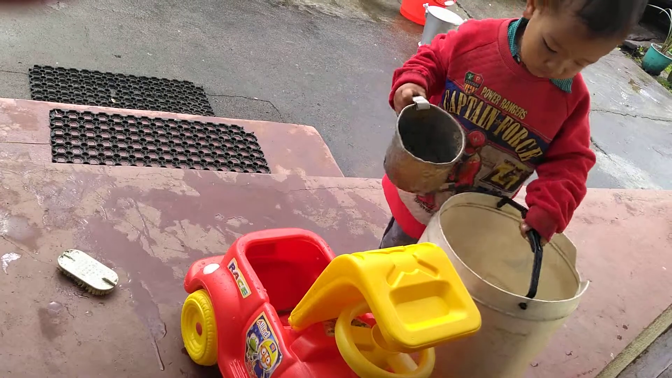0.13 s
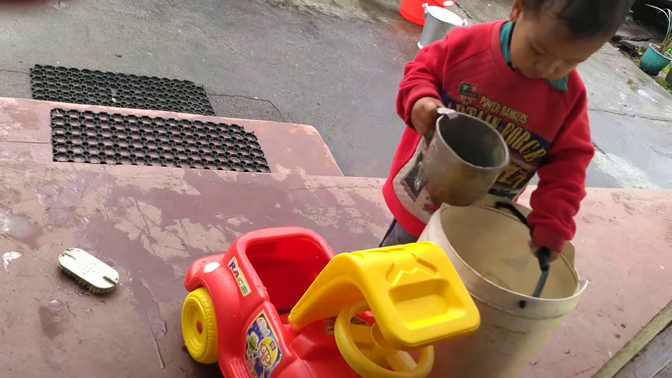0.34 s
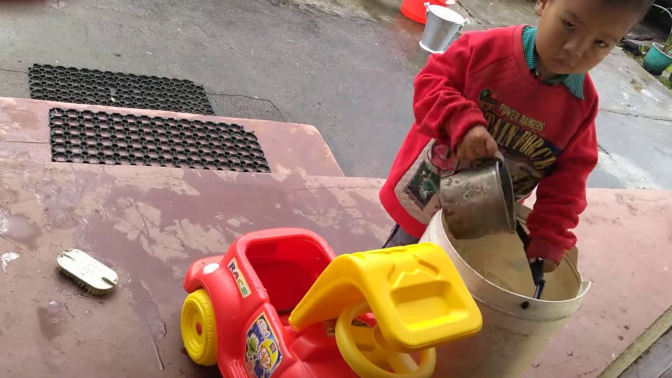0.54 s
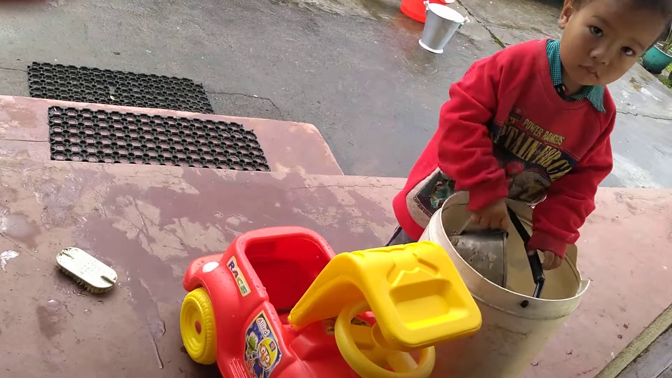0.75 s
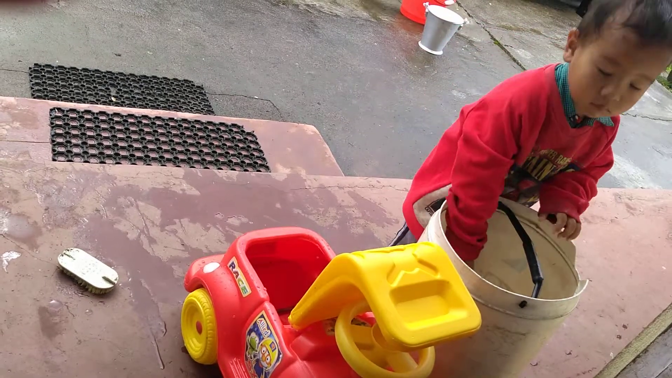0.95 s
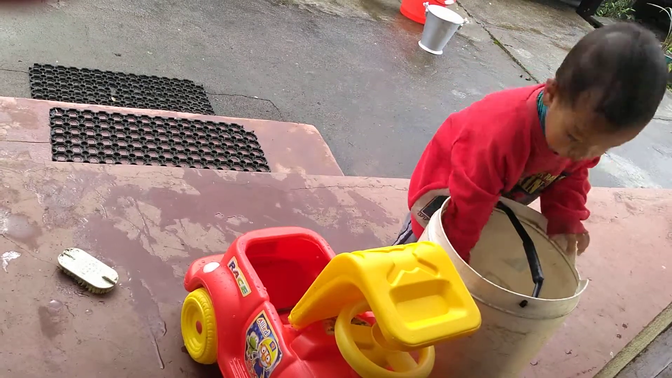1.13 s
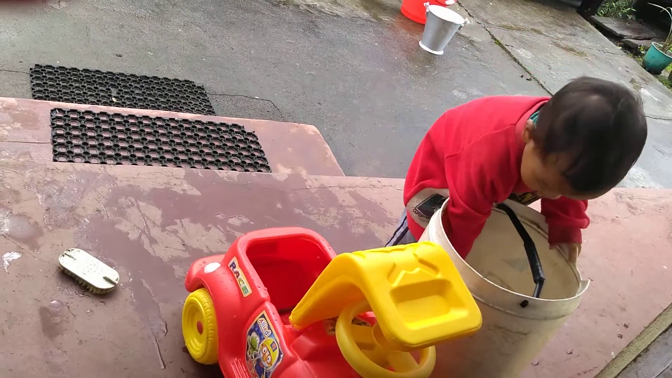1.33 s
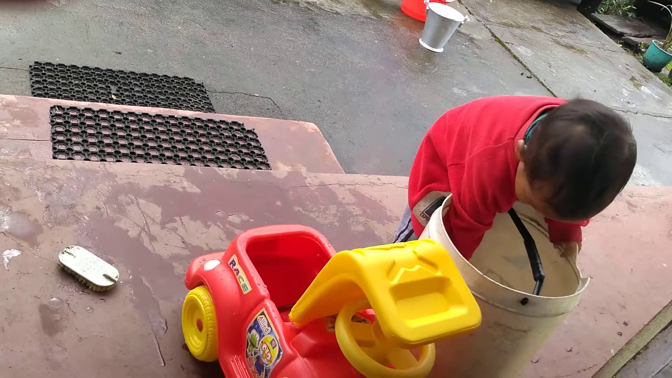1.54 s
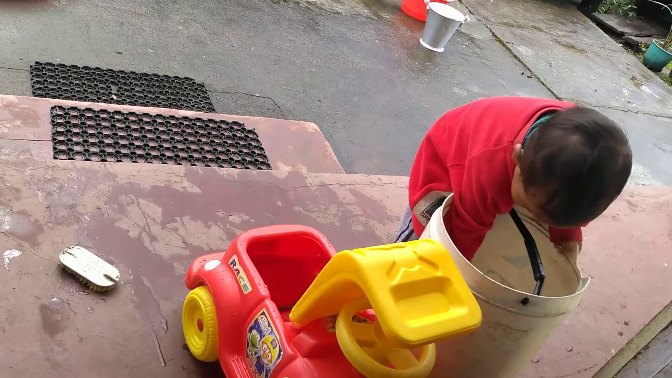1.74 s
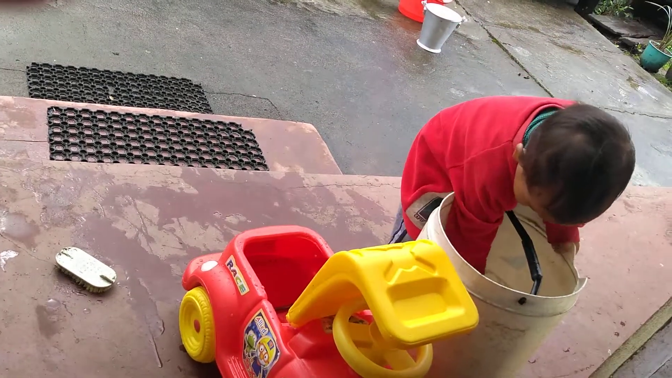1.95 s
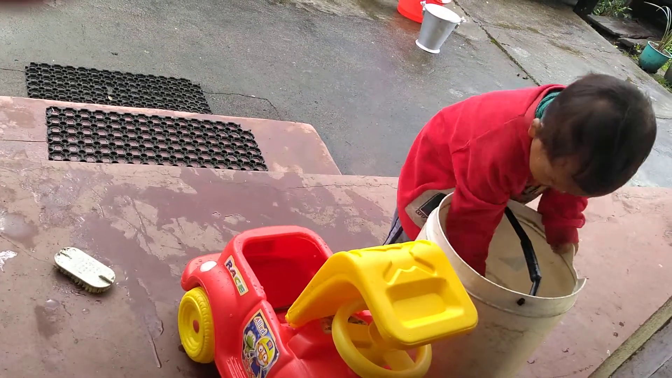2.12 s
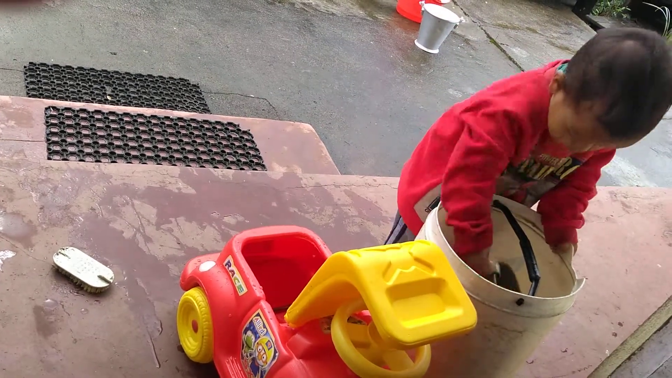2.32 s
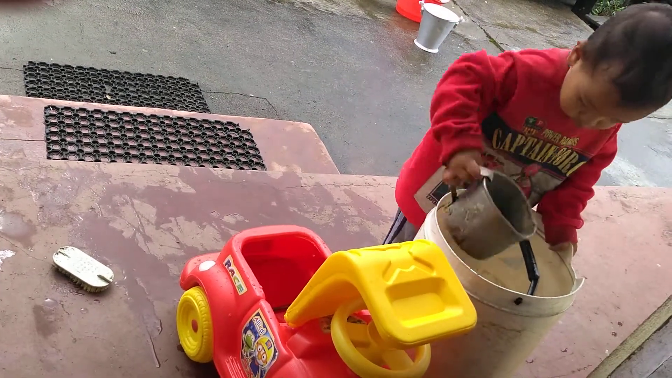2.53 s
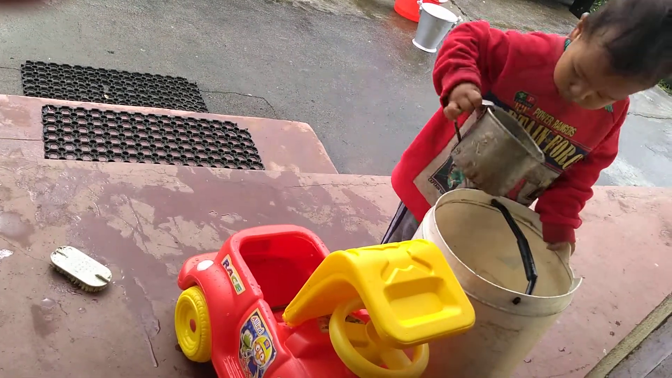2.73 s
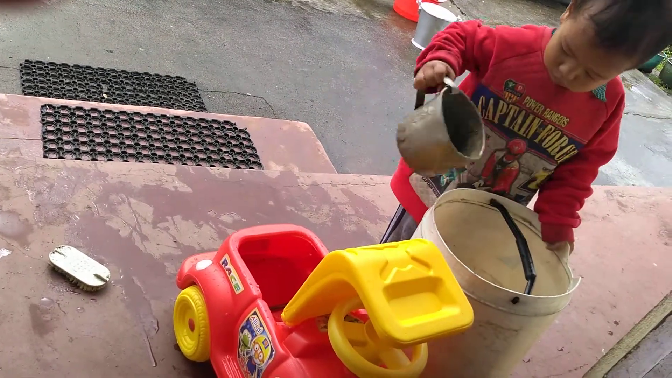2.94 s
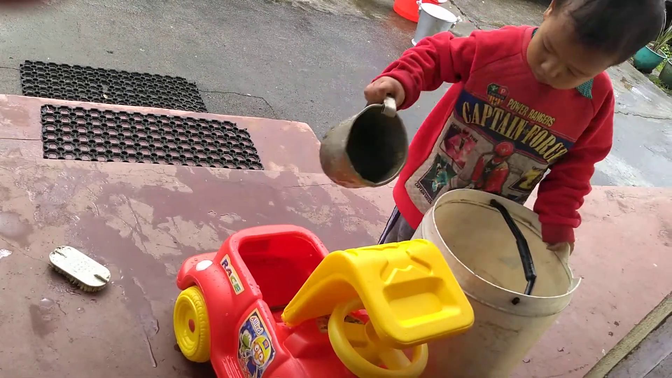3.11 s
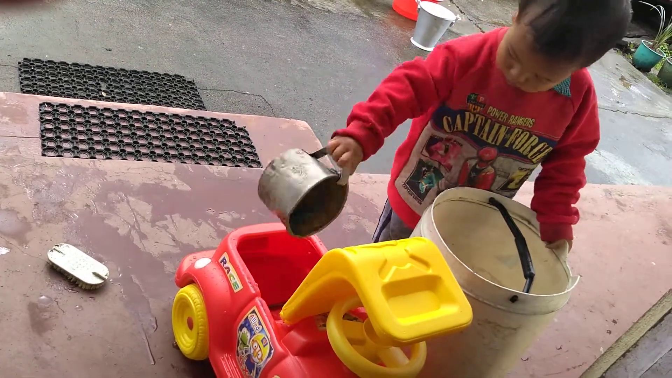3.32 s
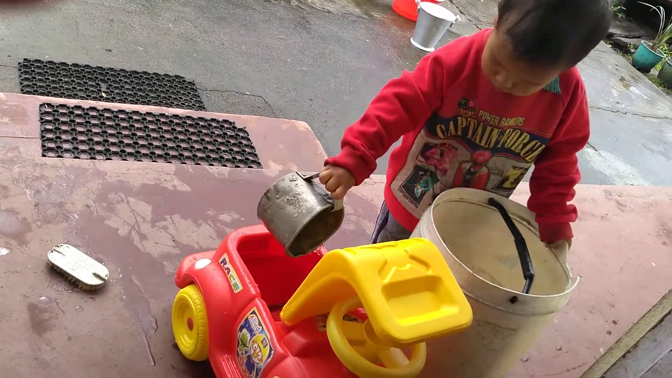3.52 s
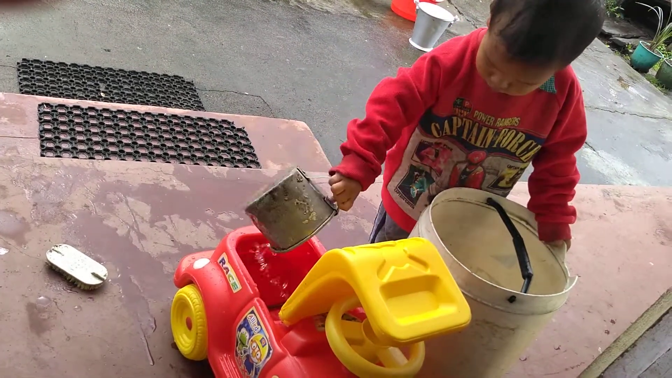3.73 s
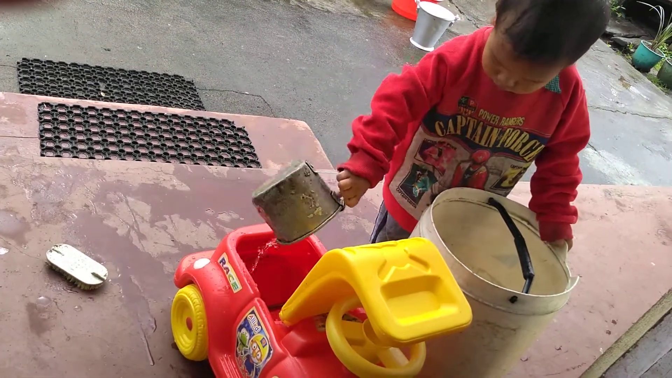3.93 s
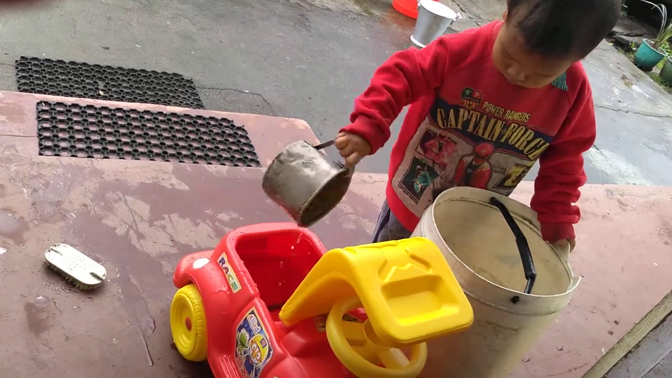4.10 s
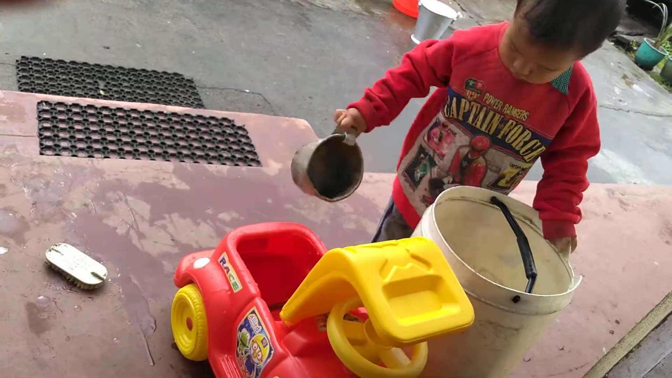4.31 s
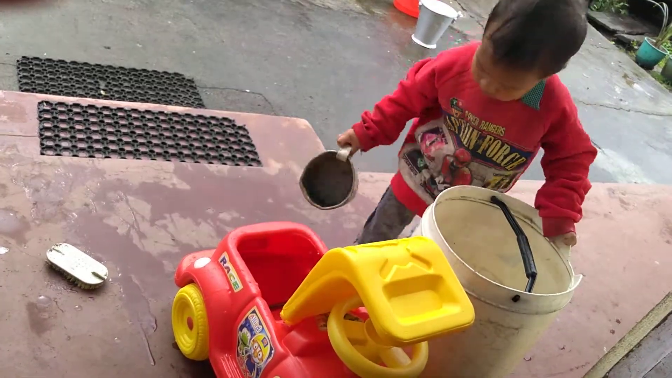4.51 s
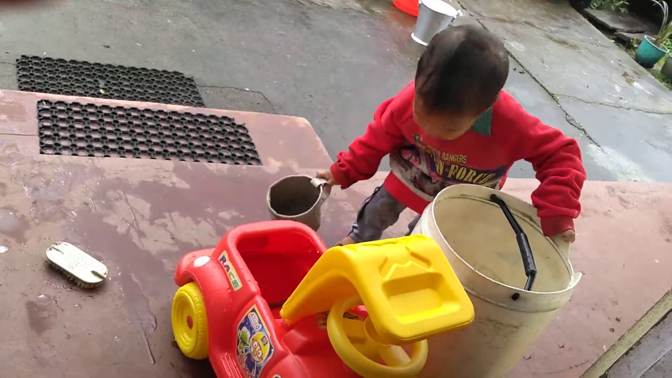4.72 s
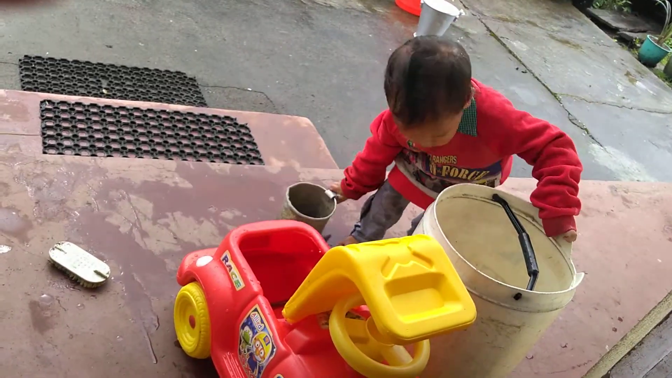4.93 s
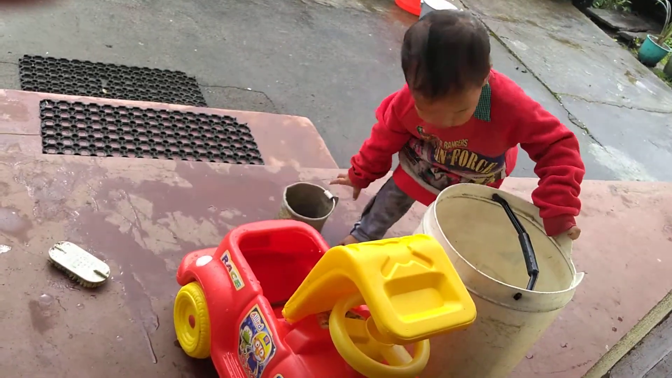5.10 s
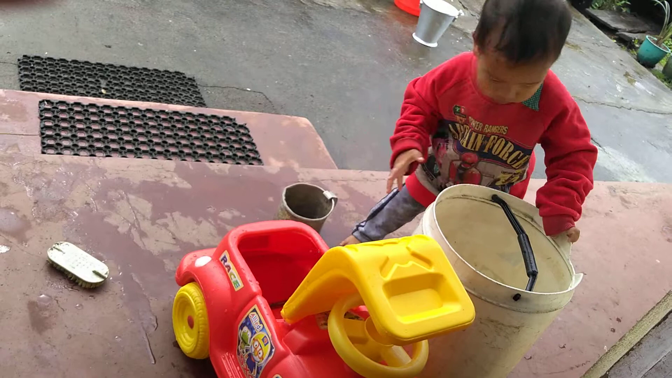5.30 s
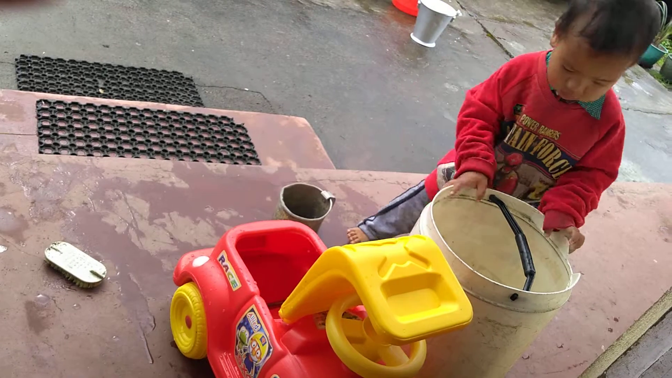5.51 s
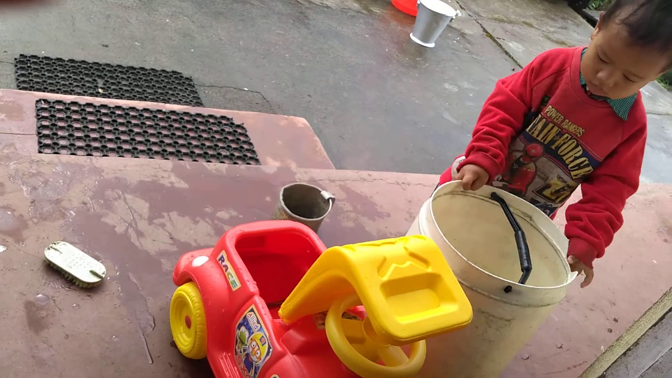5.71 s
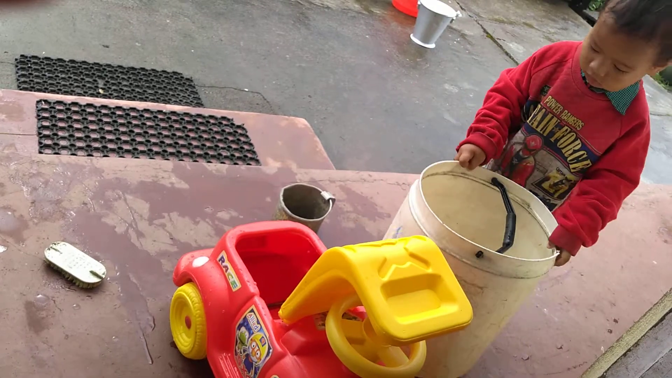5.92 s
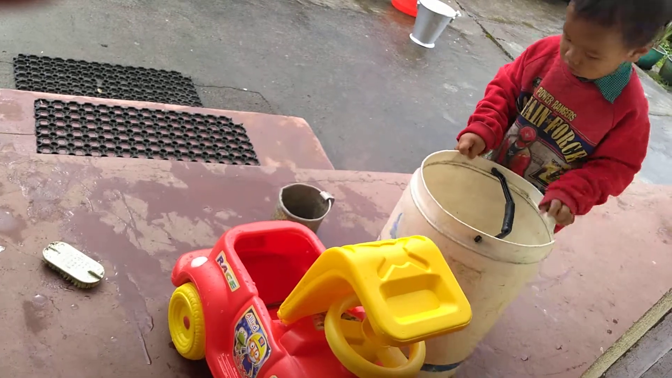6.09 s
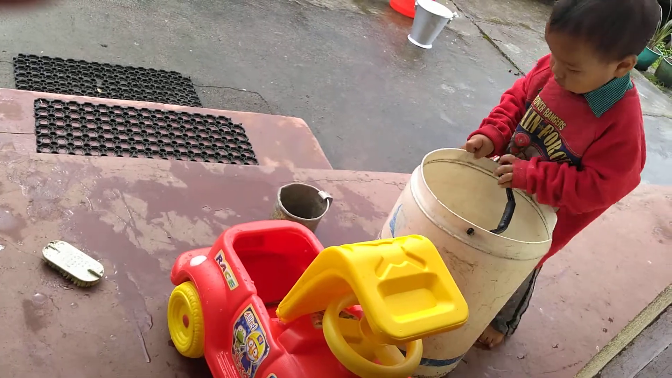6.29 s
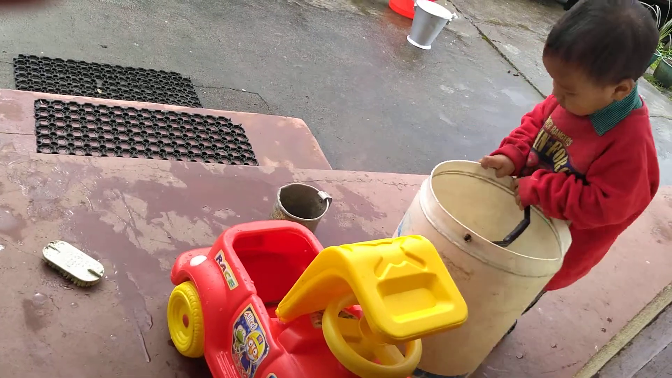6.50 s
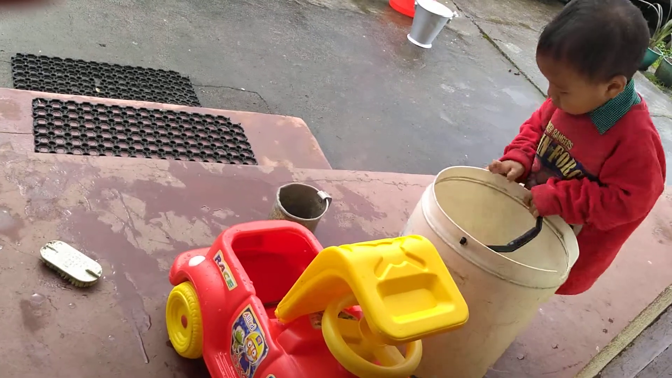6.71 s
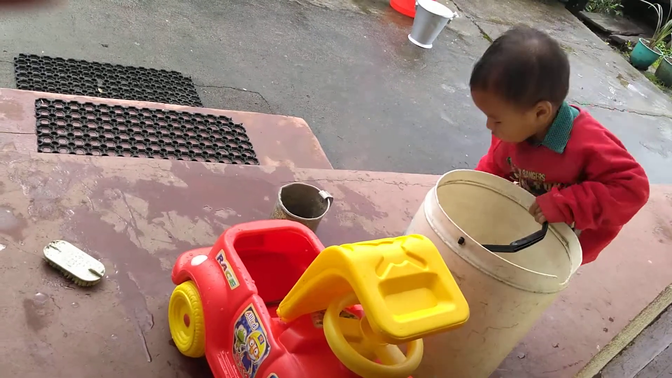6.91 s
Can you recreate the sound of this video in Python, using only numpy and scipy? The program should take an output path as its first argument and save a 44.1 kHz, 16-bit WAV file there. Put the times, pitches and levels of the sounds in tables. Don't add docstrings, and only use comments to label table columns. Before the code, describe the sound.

Hollow knocks and gritty rubs come from a plastic bucket right by a stereo microphone, with a strong boom before a quieter gap. A small spill of water patters and slops in a metal mug. The mug hits the hard floor, bright and ringing, and settles. Stuttering bucket scrapes and raps follow. Short porch echo, soft yard noise, faint low hum, wind buffets, and late far-off bird notes surround it.

```python
import sys
import numpy as np
from scipy import signal
from scipy.fft import rfft, irfft, next_fast_len
from scipy.io import wavfile
from scipy.ndimage import uniform_filter1d

SR = 44100
rng = np.random.default_rng(int(sys.argv[2]) if len(sys.argv) > 2 else 0)


def natural_amplitude(level_db):
    exponent = np.asarray(level_db, float) / 20
    return 10 ** exponent


def bounce(signal):
    frames = np.transpose(np.atleast_2d(signal))
    limited = np.clip(frames, -1, 1)
    pcm = np.round(limited * 32767).astype(np.int16)
    wavfile.write(sys.argv[1], SR, pcm)


N = 306495


def evened(x):
    return x / np.sqrt(np.mean(x ** 2) + 1e-20)


def read(points, hz):
    f, value = np.transpose(points)
    return np.interp(np.log(hz + 1), np.log(f + 1), value)


def add(mix, s, sound):
    part = mix[round(s * SR):][:len(sound)]
    part += sound[:len(part)]


def band(x, lo_hz, hi_hz):
    return evened(signal.sosfilt(signal.butter(2, [lo_hz, hi_hz], "bandpass", fs=SR, output="sos"), x))


def resonate(x, hz, width_hz):
    r = np.exp(-np.pi * width_hz / SR)
    return 2 * signal.lfilter([1 - r], [1, -r * np.exp(2j * np.pi * hz / SR)], x).real


def grains(per_s, spread_db):
    size = np.minimum(rng.exponential(1, N), 3)
    clicks = rng.standard_normal(N)
    hit = rng.random(N) < per_s / SR
    return np.where(hit, natural_amplitude(spread_db * size) * clicks, 0)


def strokes(rows):
    t = np.arange(0, N + 32, 32) / SR
    power = 0
    for s, rise, fall, *db in rows:
        away = np.maximum((s - t) / np.minimum(rise, 0.2), (t - s) / fall)
        power = power + natural_amplitude(np.array(db)[:, None] - 20 * away) ** 2
    return [np.interp(np.arange(N) / SR, t, np.sqrt(p)) for p in power]


def placed(x, left_db, lead):
    size = next_fast_len(len(x), True)
    limit = np.pi / 3.5
    turn = np.exp(1j * np.clip(np.pi * np.fft.rfftfreq(size) * lead, -limit, limit))
    z = rfft(x, size)
    ports = irfft(np.array([z * turn, z / turn]), size)[:, :len(x)]
    return ports * natural_amplitude(np.array([[left_db], [-left_db]]) / 2)


# pitch in Hz, level in dB per Hz.
YARD_SPECTRUM = [(100, -10), (130, -22.5), (200, -23), (350, -32), (700, -33.5), (1700, -35.5), (3000, -36),
                 (6000, -40), (8500, -39), (9300, -36), (9700, -45.5), (13000, -46), (15000, -41),
                 (16300, -72)]
# pitch in Hz, left-right likeness from -1 to 1.
PORT_LIKENESS = [(60, 0.3), (180, 0.21), (550, 0.34), (1650, -0.32), (4970, -0.083), (15000, 0.035)]


def air():
    frames, hz = N // 256 + 5, np.fft.rfftfreq(1024, 1 / SR)
    a, b, c, d, patches = rng.standard_normal((frames, 513, 5)).T
    patches = evened(uniform_filter1d(uniform_filter1d(patches, 14, 0), 14, 1))
    same = np.clip(read(PORT_LIKENESS, hz), -1, 1)[:, None]
    left = a + 1j * b
    z = np.array([left, same * left + np.sqrt(1 - same ** 2) * (c + 1j * d)])
    z = z * (natural_amplitude(read(YARD_SPECTRUM, hz)) * (hz > 100))[:, None]
    z = z * natural_amplitude(4.1 * patches / (1 + hz[:, None] / 4000))
    noise = evened(signal.istft(z, nperseg=1024, noverlap=768)[1][:, :N])
    return natural_amplitude(-54.5) * noise * natural_amplitude(np.array([[-0.8], [0.8]]))


# pitch in Hz, t60 in seconds.
PORCH_DECAY = [(100, 0.83), (260, 0.67), (700, 0.63), (1840, 0.37), (4850, 0.55), (12000, 0.22)]


def porch(x):
    out, turn = np.zeros((2, N)), np.arange(N) / SR * 2 * np.pi * 4.3
    for k in range(3):
        taps = np.zeros((2, SR))
        at = np.arange(200, SR - 20, 20) + rng.integers(0, 20, (2, (SR - 201) // 20))
        np.put_along_axis(taps, at, rng.choice([-1., 1.], at.shape), 1)
        hz, t, z = signal.stft(taps + 0.22 * taps[::-1], SR, nperseg=256)
        alike = 1 / (1 + (hz[:, None] / 220) ** 2)
        z = (z + alike * z[::-1]) / (1 + alike)
        dull = (1 - 0.75 * alike[:, 0]) / (1 + hz / 9000)
        decay = natural_amplitude(-60 * t / read(PORCH_DECAY, hz)[:, None])
        tail = signal.istft(z * dull[:, None] * decay, SR, nperseg=256)[1]
        tail = tail / np.linalg.norm(tail[0])
        share = np.sqrt((1 + np.cos(turn + 2 * np.pi * k / 3)) / 3)
        out += signal.fftconvolve((share * x)[None], tail, axes=1)[:, :N]
    return out * natural_amplitude(np.array([[-1.5], [1.5]]))


# time in seconds, level in dB.
HUM_LEVEL = [(0.0, -58), (0.301, -69), (0.602, -55), (0.9, -52), (3.552, -53.5), (3.8, -67), (4.05, -78),
             (4.45, -64), (4.65, -55), (5.3, -69), (5.52, -51), (5.65, -56), (6.46, -48.5), (6.95, -55)]


def machine_hum():
    hum_hz = 103.4
    steady = np.sin(2 * np.pi * hum_hz * np.arange(N) / SR)
    waver = evened(resonate(rng.standard_normal(N), hum_hz, 3.5))
    level_db = np.interp(np.arange(N) / SR, *np.transpose(HUM_LEVEL))
    return natural_amplitude(level_db) * evened(steady + 0.084 * waver)


# start in seconds, level in dB, fall in seconds.
WIND_GUSTS = [(0.001, -47, 0.12), (.58, -47, 0.25), (.95, -48, 0.65), (1.33, -46, 0.047), (1.49, -64, .3),
              (1.925, -36, 0.14), (2.5, -41, 0.073), (3.1, -51, 0.53), (3.72, -74, 0.23), (4.51, -40, 0.32),
              (5.32, -47, 0.13), (5.5, -48, 0.24), (5.79, -47.5, 0.1), (6.14, -45.5, 0.34),
              (6.46, -44.5, 0.24), (6.77, -51, 0.44)]


def wind():
    lumps = band(band(rng.standard_normal(N), 48, 88), 54, 100)
    rise_s, breeze_db = 0.027, -65.5
    gusts = strokes([(s, rise_s, fall, db) for s, db, fall in WIND_GUSTS])[0]
    return (gusts + natural_amplitude(breeze_db)) * lumps


# start in seconds, length in seconds, level in dB, pitch in Hz.
HEEL_THUMPS = [
    (5.143, 0.054, -33.5, 75),
    (5.195, 0.046, -28.5, 75),
    (5.25, 0.039, -36, 76),
]


def slab_thumps():
    out = np.zeros(N)
    for s, length, db, hz in HEEL_THUMPS:
        t = np.arange(0, length, 1 / SR)
        add(out, s, natural_amplitude(db) * np.sqrt(np.sin(np.pi * t / length)) * np.sin(2 * np.pi * hz * t))
    return out


# start in seconds, length in seconds, first pitch in Hz, last pitch in Hz, level in dB.
BIRD_NOTES = [(5.55, 0.067, 3020, 3360, -60), (5.696, 0.021, 3250, 3280, -60),
              (5.79, 0.022, 3120, 3340, -50), (5.822, 0.035, 3220, 3220, -63),
              (6.048, 0.15, 2940, 2960, -61), (6.545, 0.053, 2880, 2920, -56),
              (5.96, 0.069, 3050, 3050, -53), (6.158, 0.11, 3037, 3010, -58),
              (6.317, 0.081, 2970, 2970, -59), (6.419, 0.1, 2810, 2850, -51.5),
              (6.661, 0.24, 2857, 2810, -46.5), (6.903, 0.039, 2640, 2820, -47)]


def bird():
    out = np.zeros(N)
    sag_hz_per_s2 = 17000
    waver = evened(uniform_filter1d(rng.standard_normal((2, N)), size=500))
    for s, length, first_hz, last_hz, db in BIRD_NOTES:
        count, at = round(length * SR), round(s * SR)
        pitch, level = waver[:, at:at + count]
        u = np.arange(len(pitch)) / count
        hz = np.linspace(first_hz, last_hz, len(pitch)) + 14 * pitch
        hz = hz - sag_hz_per_s2 * length ** 2 * u * (1 - u)
        whistle = np.sin(2 * np.pi * np.cumsum(hz) / SR)
        add(out, s, natural_amplitude(db + 6.5 + 2.23 * level) * whistle * signal.windows.tukey(len(hz), 0.21))
    return out


# start in seconds, peak in dB, pitch in Hz,
# treble in dB, length in ms.
WATER_DROPS = [(0.123, -39.5, 2770, -58, 9.3), (3.325, -35.5, 9800, -44, 4.2),
               (3.325, -38.5, 3940, -55, 7.9), (3.76, -53, 1390, -43, 6.4), (3.7757, -48, 5460, -46, 15),
               (3.8214, -40, 4590, -39, 9.8), (3.8823, -39, 2200, -60, 5.6), (4.069, -42, 1270, -36, 2.5),
               (4.0923, -35, 11400, -38, 5.4), (4.1042, -48, 1650, -67, 2.4), (4.1646, -41, 7760, -36, 3.1),
               (4.44, -48.5, 1230, -54.5, 12), (4.467, -46, 1780, -65, 8.5), (3.79, -50.5, 660, -70, 16),
               (3.873, -44.5, 1200, -70, 5), (4.444, -46, 810, -69.5, 12), (4.468, -46, 694, -69, 5.9),
               (5.004, -17, 1900, -57, 6.8)]
# start in seconds, level in dB, pitch in Hz.
LARGE_BUBBLE = [(0.87, -42.5, 492)]


def drops():
    out, t = np.zeros(N), np.arange(2000) / SR
    for s, db, hz, treble_db, ms in WATER_DROPS:
        fade = np.exp(-t * 1000 / ms) * np.minimum(t / 0.0039, 1)
        bubble = evened(resonate(rng.standard_normal(2000), hz, 0.14 * hz))
        bubble = bubble + 0.45 * np.sin(2 * np.pi * hz * t * (1 + 2.5 * t))
        spit = band(rng.standard_normal(2000), 2300, 13000)
        add(out, s, fade * (natural_amplitude(db) * bubble + natural_amplitude(treble_db - 4) * spit))
    for s, db, hz in LARGE_BUBBLE:
        add(out, s, natural_amplitude(db) * np.hanning(len(t)) * np.sin(2 * np.pi * hz * t))
    return out


# peak time, rise and fall in seconds, trickle in dB, spray in dB.
POUR_PULSES = [
    (3.327, 0.0042, 0.11, -51, -72.5),
    (3.488, .25, 0.077, -44.5, -67),
    (3.768, 0.022, 0.12, -45, -69),
    (3.822, 0.09, 0.077, -44, -53.5),
    (4.096, .04, 0.15, -45.5, -58),
    (4.376, 0.014, 0.41, -48, -88),
    (4.456, 0.13, 0.11, -44.5, -72.5),
]
# peak time, rise and fall in seconds, level in dB.
MUG_SLOPS = [
    (3.49, 0.2, 0.51, -53),
    (3.78, .05, 0.19, -38.5),
    (4.1, 0.085, 0.27, -40.5),
    (4.456, 0.086, 0.29, -43),
]


def pour():
    fine = grains(5700, 1.8)
    trickle, spray = strokes(POUR_PULSES)
    slop = strokes(MUG_SLOPS)[0]
    slosh = band(rng.standard_normal(N), 110, 322)
    return 0.32 * trickle * band(fine, 650, 4500) + 1.5 * spray * band(fine, 4500, 12000) + 0.51 * slop * slosh


# pitch in Hz, level in dB, t60 in seconds.
MUG_MODES = [(600, -23, .2), (668, -14, .35), (689, -10, .32), (762, -10, .22), (830, -12, .15),
             (1305, -14, .15), (1434, -14, .15), (1900, -14, .07), (2072, -14, .3), (2490, -13, .28),
             (2803, -15, .3), (3400, -10, .22), (3890, -6, .1), (4860, -13, .2)]
# start in seconds, ring in dB, crack in dB, damping factor, extra dB of upper modes.
MUG_CLINKS = [
    (.551, -27, -46, 0.31, -8),
    (4.7281, -9.5, -14.5, 0.99, -3),
    (4.742, -6, -13, 0.28, -17),
    (4.789, -10, -30, 0.3, -10),
    (4.903, -25.5, -38, 1, -14.5),
    (5.004, -22.5, -31.5, 1, -23),
    (5.012, -14, -46, 0.16, -25),
]


def mug_clinks():
    out, t = np.zeros((2, N)), np.arange(SR // 2) / SR
    lobes = -0.4 + 0.6 * np.cos(2.42 * np.arange(len(MUG_MODES)))
    fade = np.minimum(t / 0.0006, 1) * np.cos(np.pi * t) ** 2
    f, d, t60 = np.transpose(MUG_MODES)[:, :, None]
    for s, ring_db, crack_db, damping, upper_db in MUG_CLINKS:
        phase = rng.uniform(-0.7, 0.7, len(MUG_MODES))
        noise = rng.standard_normal(len(t))
        crack = band(noise, 270, 6630) + 0.29 * band(noise, 4400, 9900)
        crack = crack * (np.exp(-t / 0.004) + 0.055 * np.exp(-t / 0.07))
        wobble = natural_amplitude(1.8 * evened(uniform_filter1d(rng.standard_normal((len(MUG_MODES), len(t))), 600)))
        decay = np.exp(t * (2j * np.pi * f - np.log(1000) / (t60 * damping)))
        modes = wobble * natural_amplitude(d + upper_db * (f > 2400)) * decay
        for side, line, heard in zip((1, -1), out, placed(crack, -1.7, lead=-1.9)):
            ring = (np.exp(1j * (phase + side * lobes)) @ modes).imag
            add(line, s, (natural_amplitude(ring_db) * ring + natural_amplitude(crack_db + 8) * heard) * fade)
    return out


# start in seconds, peak in dB, t60 in seconds, left lead in radians.
MUG_SINGS = [(.553, -49, 0.35, .4), (4.728, -6.5, 0.19, 1.2), (4.737, 0, 0.092, 0.44),
             (4.729, -16, .55, -0.2), (4.84, -25.5, .3, 2), (4.728, -1, 0.072, -.8),
             (4.728, -10.5, 0.44, 1.7), (4.745, -15, 0.46, 1.8), (4.787, -10.5, 0.077, 1),
             (5.004, -27.5, 0.25, -1.5), (5.06, -50.5, 0.73, .5)]
MUG_SING_HZ = [2172, 1040, 1049, 1045, 1046, 2138, 2175, 2115, 2146, 2183, 2172]


def mug_singing():
    out, t = np.zeros((2, N)), np.arange(SR // 2) / SR
    fade = np.minimum(t / 0.0006, 1) * np.cos(np.pi * t) ** 2
    for (s, db, t60, lead), hz in zip(MUG_SINGS, MUG_SING_HZ):
        wobble_db = 2.6 * evened(uniform_filter1d(rng.standard_normal(len(t)), size=600))
        shape = natural_amplitude(db + wobble_db - 60 * t / t60) * (1 - np.exp(-t / 0.002)) * fade
        for side, line in zip((0.5, -0.5), out):
            add(line, s, shape * np.sin(2 * np.pi * hz * t + side * lead))
    return out


# pitch in Hz, width in Hz, level in dB.
WALL_MODES = [(445, 25, 11), (890, 240, 15.5), (970, 840, -5), (1440, 590, 11.5), (4210, 36000, -1.5)]
# pitch in Hz, width in Hz, level in dB.
RIM_MODES = [(2280, 91, 9), (3500, 250, 9.5), (4120, 120, -16), (5380, 510, -12)]


def knock(db, crack_hz, treble_db, ms):
    t = np.arange(SR // 8) / SR
    u = t * 1000 / ms
    contact = rng.choice([-1., 1.], len(t)) * np.exp(-u * u) * np.minimum(u / 0.05, 1)
    z = rfft(contact)
    contact = irfft(z / uniform_filter1d(abs(z), size=31), len(t)) * np.exp(-u * u / 4)
    patch = resonate(resonate(contact, crack_hz, 245), crack_hz, 245)
    wall = natural_amplitude(3.5 + 1.67 * ms) * patch
    for f, width, d in WALL_MODES:
        wall = wall + natural_amplitude(d) * resonate(contact, f, width)
    rim = 0
    for f, width, d in RIM_MODES:
        rim = rim + natural_amplitude(d + 3 * rng.standard_normal()) * resonate(contact, f, width)
    snap = band(contact, 3500, 8500) + 0.57 * evened(rim)
    share = np.sqrt(ms / 125)
    return share * (natural_amplitude(db - 8.5) * band(wall, 250, 4500) + natural_amplitude(treble_db) * evened(snap))


# start in seconds, peak in dB, crack pitch in Hz, treble in dB, contact in ms.
WALL_KNOCKS = [(0.45, -31.5, 886, -61, 6.6), (0.552, -24, 770, -44.5, 13.6), (0.943, -19.5, 1454, -41.5, 9),
               (1.315, -25, 1480, -51, 10.3), (1.479, -26, 1156, -65.5, 10.8),
               (1.917, -16, 1636, -37.5, 12.3), (2.471, -3, 1114, -84, 7.2), (5.474, -34.5, 905, -56, 6.2),
               (6.019, -25, 1600, -44.5, 21), (6.174, -36.5, 1720, -55, 11), (6.3405, -39, 860, -57, 4),
               (6.585, -20, 820, -46, 6.7), (6.6545, -17, 856, -40, 5.6)]
# start in seconds, peak in dB, crack pitch in Hz,
# treble in dB, contact in ms.
SKIDS_AND_TICKS = [(0.004, -25.5, 820, -46, 5.8), (0.049, -38, 970, -55.5, 27), (0.091, -32.5, 940, -53, 12),
                   (1.782, -37, 1000, -65.5, 38), (1.955, -31, 1240, -68, 25), (1.974, -30.5, 1480, -47, 13),
                   (2.004, -24.5, 1510, -71, 16), (2.067, -26.5, 1440, -36, 13.4), (5.702, -38.5, 939, -60, 14),
                   (5.765, -21.5, 1450, -38.5, 12), (5.969, -30.5, 2040, -56, 12),
                   (6.241, -31.5, 1460, -57.5, 20), (6.421, -34, 970, -54, 15), (6.466, -25, 905, -43, 15),
                   (6.549, -26.5, 860, -41.5, 9), (6.900, -26.5, 950, -56.5, 18), (6.914, -29.5, 920, -37, 3.3),
                   (.038, -34.5, 920, -60, 29), (.075, -35, 2630, -56, 8.8), (1.827, -30.5, 710, -57, 18),
              (1.865, -33, 700, -59, 15), (1.897, -26.5, 1140, -54, 12), (1.952, -27.5, 537, -62, 10),
              (2.0741, -19, 1700, -50.5, 9.7), (2.083, -32.5, 590, -48.5, 11),
              (5.7447, -29, 867, -57, 10.4), (5.7577, -27, 870, -51.5, 8.9), (5.836, -27.5, 2010, -43, 8.9),
              (5.861, -25, 1500, -48, 9.1), (5.9013, -23.5, 2020, -48, 15.6),
              (5.936, -32.5, 2120, -61, 7.4), (6.044, -33, 815, -53, 10), (6.262, -34.5, 1360, -57, 8.6),
              (6.395, -34.5, 830, -53, 9), (6.478, -31, 830, -44, 7.5), (6.668, -45, 880, -62, 22),
              (6.713, -36.5, 1580, -66, 15)]


def bucket_knocks():
    out = np.zeros(N)
    for s, *row in WALL_KNOCKS + SKIDS_AND_TICKS:
        add(out, s, knock(*row))
    return out


# start in seconds, peak in dB, pitch in Hz, t60 in seconds.
MODE_PINGS = [(.449, -34, 860, 0.056), (0.447, -37, 1360, 0.055), (.448, -46, 1770, 0.025),
              (.551, -31, 1710, 0.046), (.6, -42, 2240, .08), (.945, -34, 1460, 0.048),
              (1.315, -28, 1210, 0.045), (1.316, -32, 1750, .05), (1.481, -50, 1330, 0.037),
              (1.479, -37, 2050, 0.067), (1.786, -43, 2540, 0.064), (1.918, -10.5, 1490, 0.032),
              (1.975, -29, 1610, 0.08), (2.008, -46, 3650, .06), (2.07, -30, 3750, 0.049),
              (2.07, -33, 2560, 0.078), (2.472, -24, 1330, 0.067), (2.471, -26, 3780, .05),
              (2.474, -27, 2150, 0.093), (6.022, -29, 2660, 0.043), (6.341, -49, 2520, 0.033),
              (6.468, -26.5, 1690, .04), (6.586, -31, 2080, .04), (6.586, -37, 4470, .03),
              (6.586, -33, 845, 0.074), (6.655, -26, 3700, 0.032), (6.655, -41, 4480, .03),
              (6.655, -24, 2500, 0.038), (6.655, -44, 830, 0.05), (6.668, -36, 860, .06)]


def bucket_pings():
    out, t = np.zeros(N), np.arange(SR // 8) / SR
    for s, db, hz, t60 in MODE_PINGS:
        rough = evened(resonate(rng.standard_normal(len(t)), hz, 220))
        ring = np.sin(2 * np.pi * hz * t) + 0.7 * rough
        add(out, s, natural_amplitude(db - 60 * t / min(t60, 0.09)) * (1 - np.exp(-t / 0.003)) * ring)
    return out


# pitch factor, level in dB, t60 in seconds.
DRUM_MODES = [(1.0, 3, 0.35), (0.65, -9, 0.18), (1.2, -12.5, 0.42), (0.51, -21, 0.2), (0.58, 9, 0.013),
              (2.1, -8, 0.091), (1.7, -16.5, 0.083)]


def boom(db, hz, damping, ms):
    t, phase = np.arange(SR // 2) / SR, rng.uniform(-1.5, 1.0, len(DRUM_MODES))
    modes = 0
    for (k, d, t60), p in zip(DRUM_MODES, phase):
        decay = natural_amplitude(d * (0.5 + ms / 15) - 60 * t / (t60 * damping))
        modes = modes + decay * np.sin(2 * np.pi * hz * k * t + p)
    modes = modes * (1 - np.exp(-t * 1000 / ms)) ** 2
    return natural_amplitude(db) * modes / abs(modes).max()


def tone(db, hz, swell, t60):
    t = np.arange(SR // 2) / SR
    shape = (1 - np.exp(-t / swell)) ** 2 * natural_amplitude(-60 * t / t60)
    return natural_amplitude(db) * shape / shape.max() * np.sin(2 * np.pi * hz * t)


# start in seconds, peak in dB, pitch in Hz, damping factor, swell in ms.
BUCKET_BOOMS = [(0.001, -19.5, 194.6, 0.75, 0.61), (0.452, -35, 206, 1.2, 1.9),
                (0.552, -20, 161.8, 0.27, 0.55), (0.599, -32.5, 176, 2.4, 1.4),
                (0.947, -23.5, 200.7, 0.97, 4), (1.028, -30.5, 192.7, 2.2, 1.6),
                (1.321, -27.5, 193.4, 0.58, 11.4), (1.478, -30.5, 166.2, 2.8, 1.1),
                (1.85, -32.5, 199, 1.5, 1.2), (1.922, -21.5, 189, 0.76, 6.4), (2.078, -43, 178.8, 2.6, 10),
                (2.474, -10, 183.5, 0.63, 3.3), (2.551, -35, 200.3, 2.5, 8.3), (4.73, -22, 238, 0.13, 1.7),
                (5.001, -42.5, 205.4, 0.7, 6), (5.481, -36.5, 191.3, 1.4, 0.6),
                (5.792, -24, 189.5, 0.58, 22), (6.019, -24.5, 196, 0.17, 5.4),
                (6.467, -31.5, 196.5, 4.1, 2.6), (6.587, -29, 182, 0.37, 13), (6.656, -37, 183, 0.27, 15),
                (6.904, -37, 189.7, 0.89, 34)]
# start in seconds, peak in dB, pitch in Hz, swell in seconds, t60 in seconds.
BUCKET_TONES = [(0.0, -17, 188.2, 0.001, 0.27), (.002, -34.5, 403.5, 0.0047, 0.21),
                (.555, -34, 275, 0.0034, 0.13), (.58, -43.5, 455, 0.014, 0.14),
                (0.951, -40, 362, 0.0088, 0.29), (.96, -46, 462, 0.028, 0.25),
                (.95, -46.5, 561, 0.0051, 0.23), (1.33, -43, 450, 0.015, 0.14),
                (1.49, -46.5, 519.4, 0.0045, 0.21), (1.925, -29, 190, 0.0067, 0.42),
                (1.925, -37, 510, .006, 0.23), (2.478, -29, 193, 0.012, 0.96),
                (2.479, -34.5, 434, .006, 0.59), (2.478, -28.5, 388.6, 0.0053, 0.35),
                (5.801, -42, 184, 0.021, 0.17), (6.031, -19, 187, 0.018, 0.36),
                (6.596, -43, 185, 0.021, 0.2), (6.666, -27.5, 189.6, 0.017, 0.26)]


def bucket_booms():
    out = np.zeros(N)
    for s, *row in BUCKET_BOOMS:
        add(out, s, boom(*row))
    for s, *row in BUCKET_TONES:
        add(out, s, tone(*row))
    return out


# pitch in Hz, width in Hz, level in dB.
RUBBED_WALL = [(770, 120, 4.5), (860, 90, 4), (1460, 330, 3.5), (1930, 230, -1.5), (2102, 120, 1),
               (2594, 63, -3.5)]
# firmest contact, rise and fall in seconds, wall in dB, fizz in dB.
RUB_STROKES = [(0.004, 0.031, 0.17, -32.5, -34), (.27, 0.22, 0.76, -45.5, -41),
               (.612, 0.1, 0.026, -57, -33), (.955, 0.028, 0.018, -32.5, -57),
               (1.34, 0.011, 1, -43.5, -67.5), (1.478, 0.011, 0.097, -57, -57),
               (1.7, 0.4, 0.12, -64.5, -39.5), (1.786, 0.0042, 0.42, -37, -41),
               (1.886, 0.22, 0.093, -34, -31.5), (1.96, .04, .12, -47, -55),
               (2.068, 0.0028, 0.023, -26, -45.5), (5.48, 0.067, 0.066, -43.5, -61),
               (5.752, 0.12, 0.18, -46.5, -50), (5.815, 0.12, 0.35, -26, -32),
               (5.93, 0.08, 0.37, -32.5, -55), (6.05, 0.23, 0.18, -35, -59),
               (6.478, 0.18, 0.047, -29.5, -41), (6.57, 0.056, 0.3, -40, -33.5),
               (6.676, 0.2, 0.069, -35, -36.5), (6.902, 0.0069, 0.07, -32, -36.5)]


def bucket_rubbing():
    stick_slip = natural_amplitude(2.8 * evened(uniform_filter1d(rng.standard_normal(N), 500)))
    drag_s = 5.3
    grounded = np.where(np.arange(N) > drag_s * SR, 1, natural_amplitude(-7))
    grit = grains(2200, 3.2) * stick_slip
    wall = 0
    for f, width, d in RUBBED_WALL:
        mode = evened(resonate(grains(1000, 3.1) * stick_slip, f, width))
        wall = wall + natural_amplitude(d) * np.where(f < 1000, grounded, 1) * mode
    wall = evened(wall) + 0.25 * band(grit, 500, 2400)
    shake = rng.standard_normal(N)
    column = evened(resonate(shake, 188, 26)) + 0.5 * band(shake, 140, 280)
    fizz = band(grains(4500, 1.3) * stick_slip, 1800, 9200)
    wall_gain, fizz_gain = strokes(RUB_STROKES)
    stir_db, rise_s, fall_s, shake_db = -4, 0.023, 0.14, -2
    stirred = []
    for s, db, _, damping, ms in BUCKET_BOOMS:
        stirred.append((s + rise_s + ms / 1000, rise_s, fall_s * damping ** 0.5, db + stir_db))
    column_gain = np.hypot(strokes(stirred)[0], natural_amplitude(shake_db) * wall_gain)
    return natural_amplitude(-8) * wall_gain * wall + natural_amplitude(-9.5) * column_gain * column + natural_amplitude(-15) * fizz_gain * fizz


def scene():
    pail = bucket_knocks() + bucket_booms() + bucket_rubbing()
    cup = mug_clinks() + mug_singing()
    wet = drops() + pour()
    song = bird()
    low_end = machine_hum() + wind() + slab_thumps()
    near = placed(pail + bucket_pings(), -2.5, lead=4.9) + cup
    near = near + placed(wet, -1.2, lead=-2.5) + placed(natural_amplitude(-5) * song, -2.9, lead=0)
    room = porch(natural_amplitude(-9.5) * pail + natural_amplitude(-14.5) * cup.mean(0) + natural_amplitude(-10) * wet + natural_amplitude(-15) * song)
    return near + room + placed(low_end, -0.96, lead=34) + air()


def band_limit(x):
    return signal.sosfilt(signal.butter(12, 16100, fs=SR, output="sos"), x)


def record(dry):
    bass_edge = signal.butter(3, 46, "highpass", fs=SR, output="sos")
    treble_edge = signal.butter(8, 16000, fs=SR, output="sos")
    heard = signal.sosfilt(np.vstack([bass_edge, treble_edge]), 1.255 * np.tanh(dry / 1.294))
    return band_limit(heard)


dry = scene()
out = record(dry)
bounce(out)
```